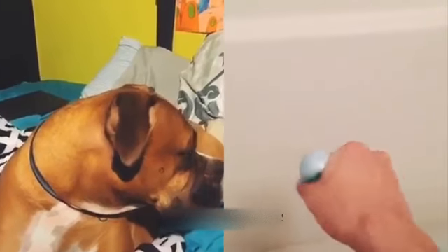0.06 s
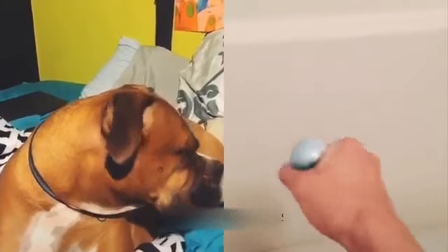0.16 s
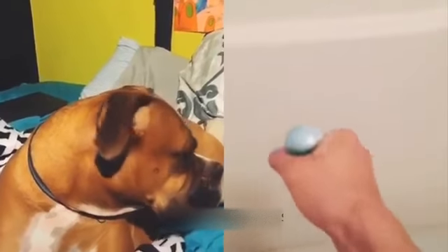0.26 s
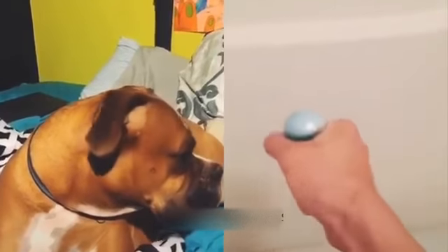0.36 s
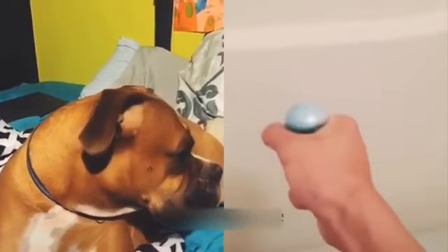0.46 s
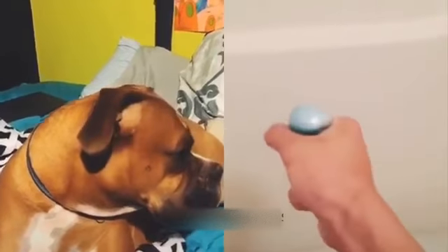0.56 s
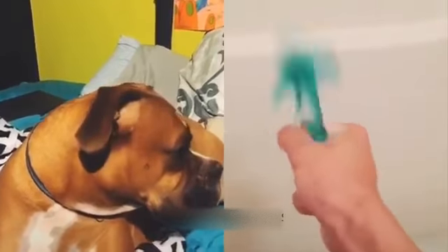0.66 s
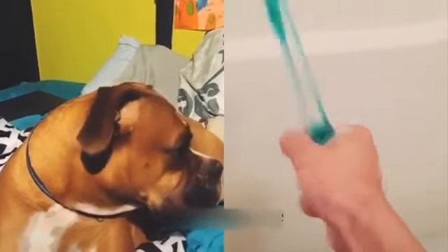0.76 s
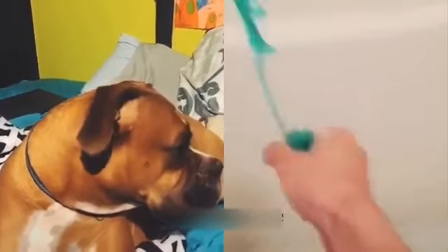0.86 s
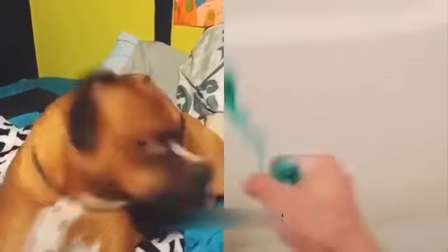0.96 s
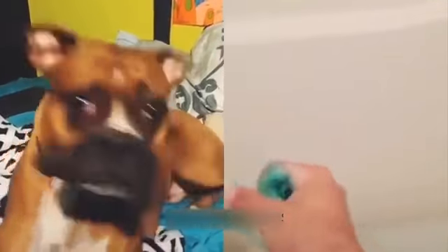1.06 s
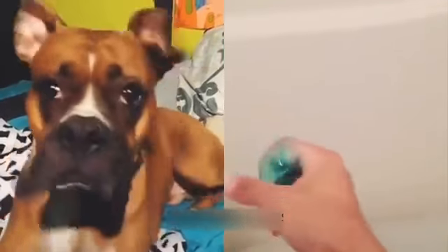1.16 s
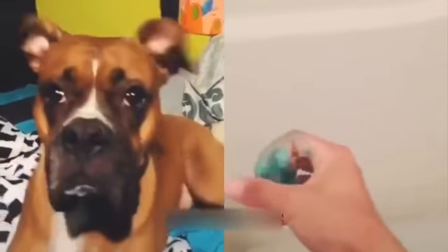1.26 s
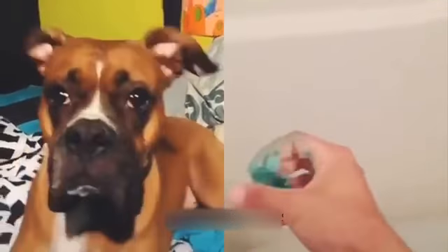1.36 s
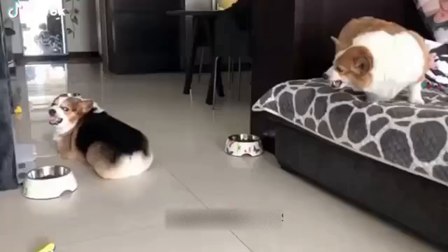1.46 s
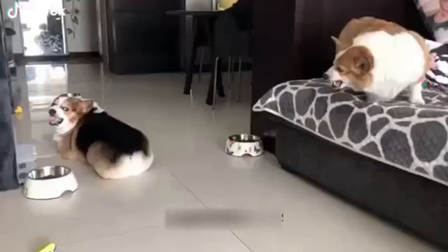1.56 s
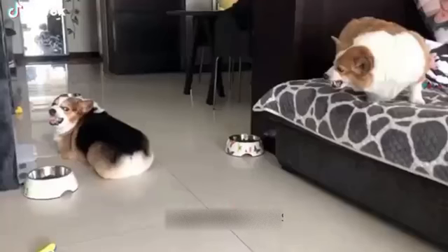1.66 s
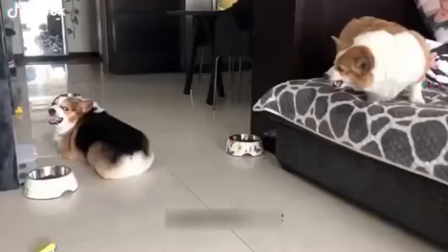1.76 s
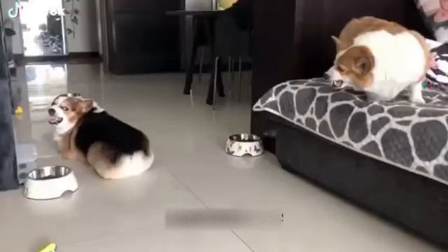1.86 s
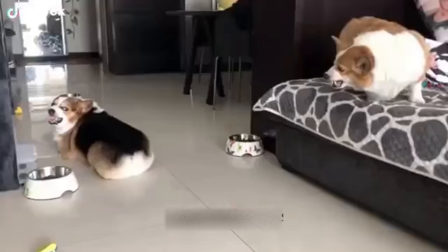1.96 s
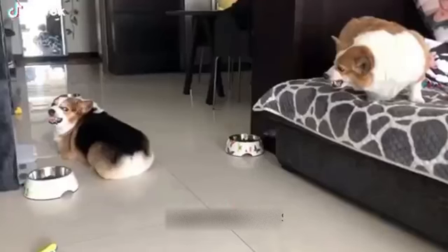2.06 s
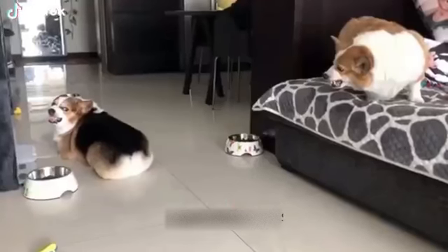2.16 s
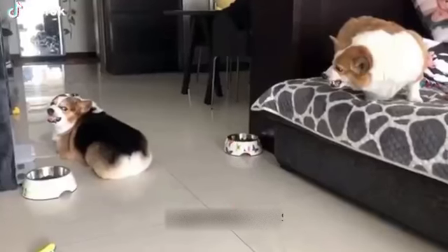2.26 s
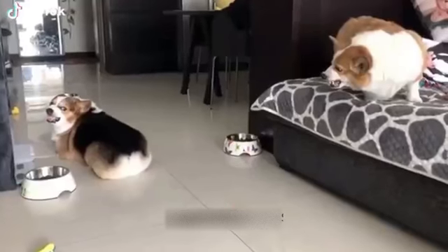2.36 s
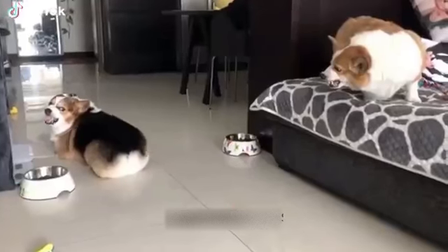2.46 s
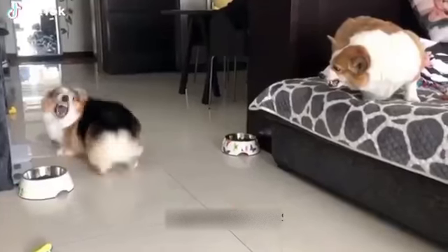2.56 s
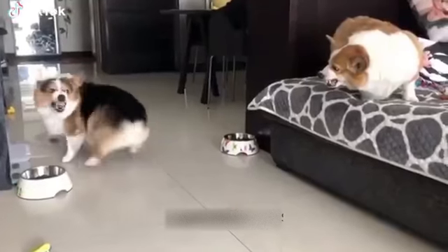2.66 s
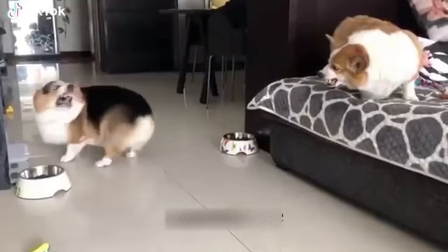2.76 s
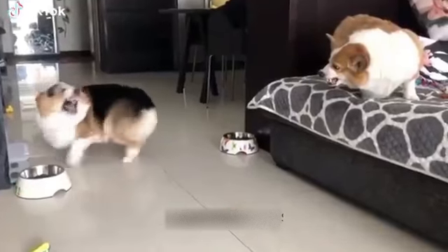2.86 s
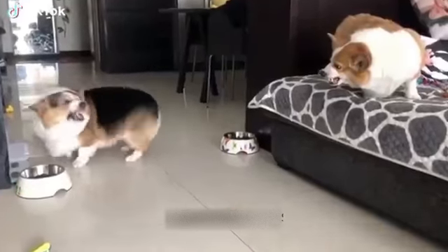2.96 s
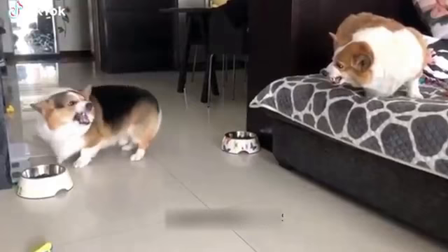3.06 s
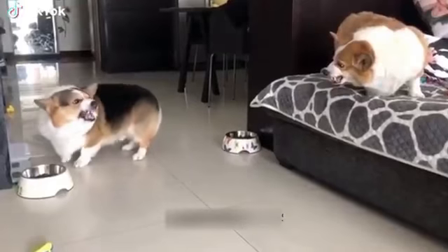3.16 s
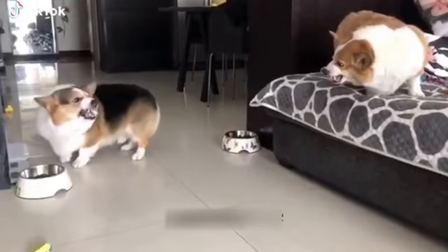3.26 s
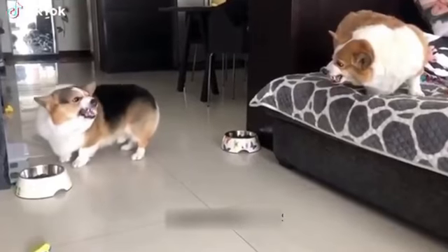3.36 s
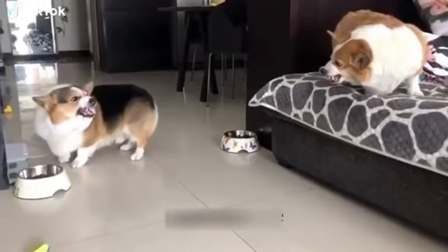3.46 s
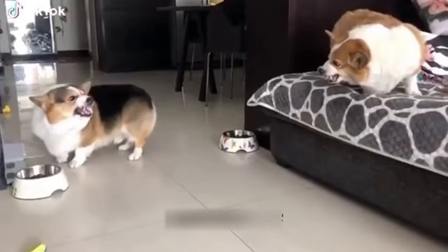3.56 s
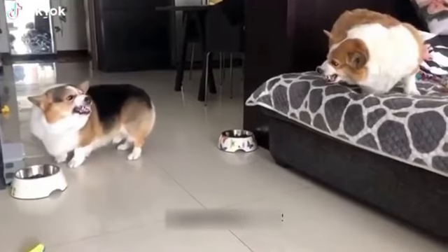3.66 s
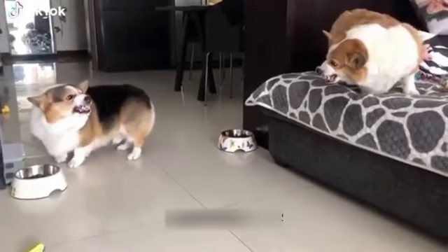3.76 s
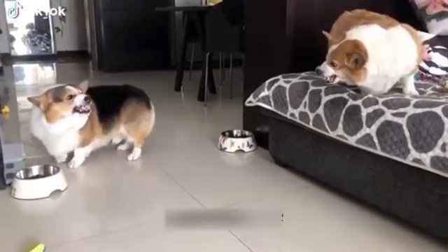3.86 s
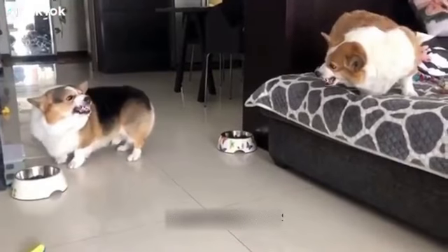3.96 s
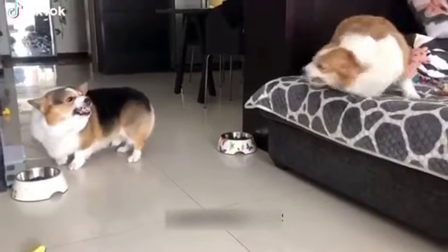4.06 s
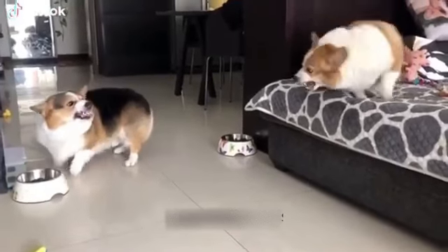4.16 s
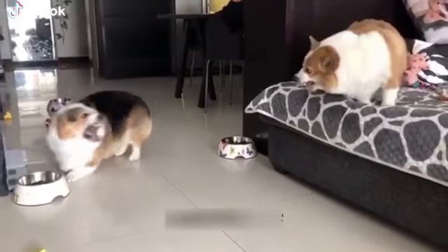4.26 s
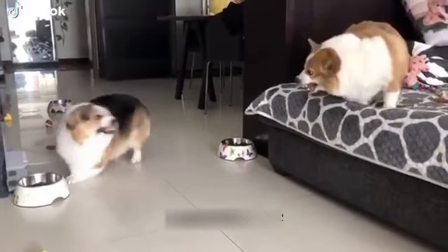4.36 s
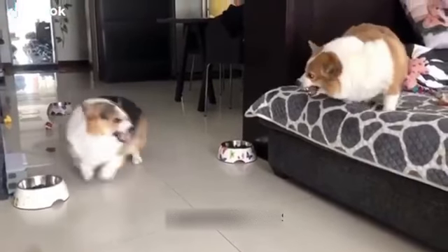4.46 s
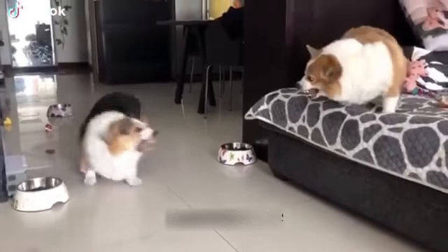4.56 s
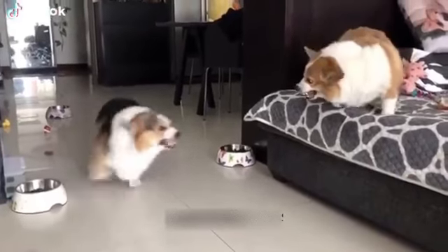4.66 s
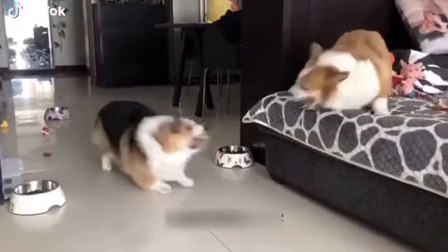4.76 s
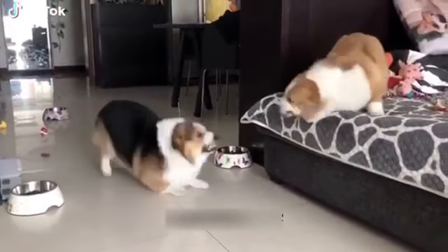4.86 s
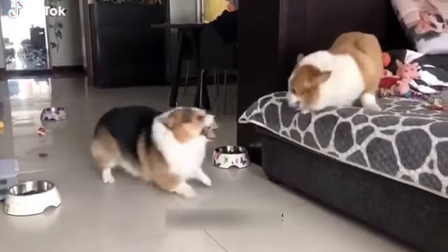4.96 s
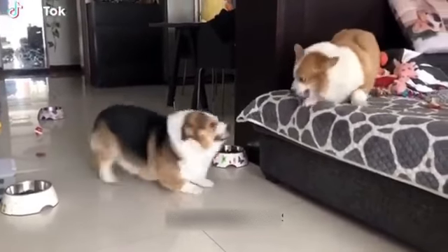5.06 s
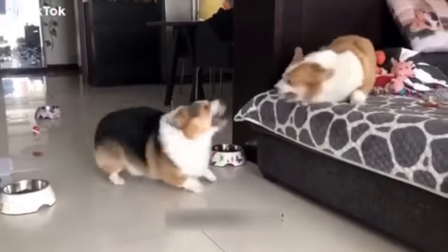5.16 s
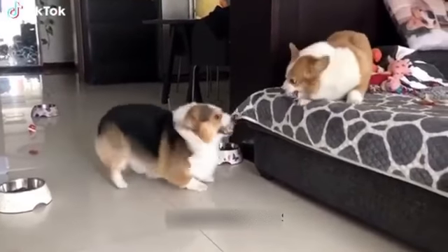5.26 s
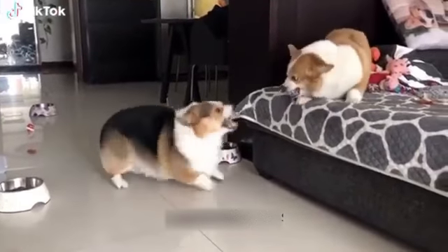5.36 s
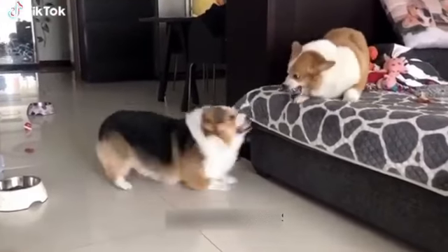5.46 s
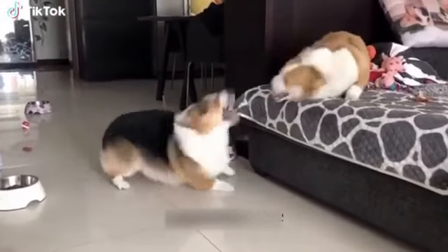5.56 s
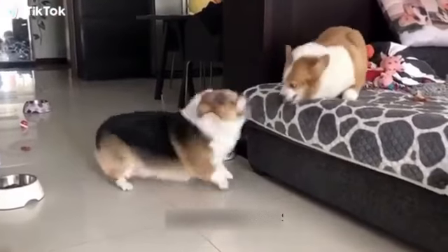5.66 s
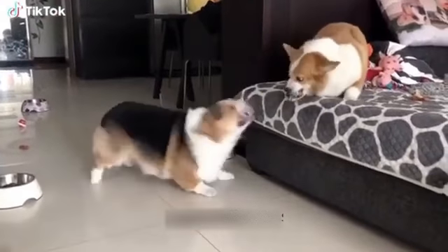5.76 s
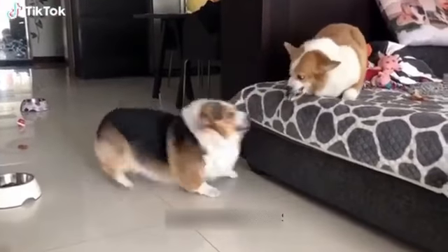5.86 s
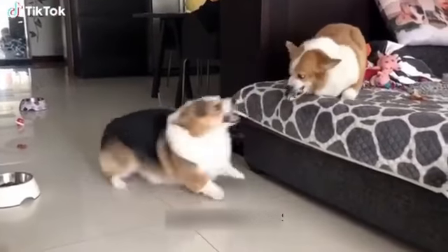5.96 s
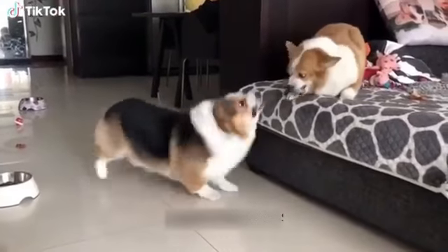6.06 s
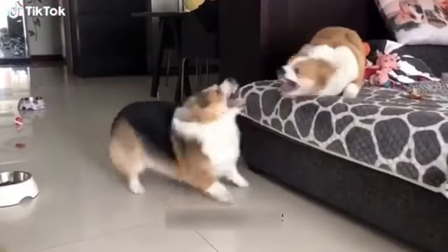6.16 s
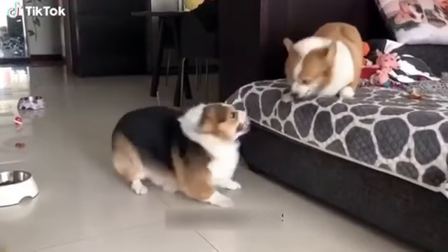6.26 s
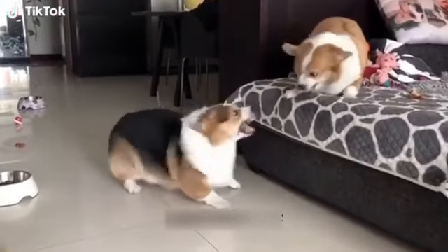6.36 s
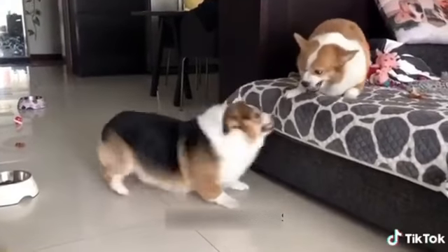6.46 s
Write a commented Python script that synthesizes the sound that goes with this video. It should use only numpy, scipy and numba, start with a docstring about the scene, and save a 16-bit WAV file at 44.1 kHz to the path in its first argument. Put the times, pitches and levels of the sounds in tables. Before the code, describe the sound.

A small quiet room hums softly until a popper scrapes and cracks violently, its short tail dying quickly. After a tiny silence the sound turns duller and more echoing: two dogs in a hard-floored living room, first growling low, then barking in single bursts and quick pairs, with wet rattling snarls and tooth clacks growing denser to the end. Loud moments distort at the nearby microphone.

```python
"""Low room air with faint tones, then a short scrape and the bang of a party popper in a small, quiet room.
After a moment of silence, two corgis quarrel in a tiled living room: a rattling growl runs on under snarls
and harsh barks, and teeth snap. The popper is shaped noise and a falling thump; the dogs' voices are rough
pulses and breath through throat resonances. The nearby microphone overloads on the loudest sounds."""
import sys
import numpy as np
from scipy import signal
from scipy.fft import rfft, irfft
from scipy.io import wavfile
from scipy.ndimage import uniform_filter1d, minimum_filter1d
from numba import njit

SR = 44100
rng = np.random.default_rng(int(sys.argv[2]) if len(sys.argv) > 2 else 0)


def waveform_to_disk(signal):
    """Save audio, clipped to [-1, 1], as 16-bit WAV at the path in sys.argv[1]."""
    frames = np.transpose(np.atleast_2d(signal))
    scaled = np.clip(frames, -1, 1) * 32767
    samples = np.round(scaled).astype(np.int16)
    wavfile.write(sys.argv[1], SR, samples)


N = 287091
TIME = np.arange(N) / SR


def undb(db):
    """Decibels to gain."""
    return 10 ** (np.asarray(db) / 20)


def level(x, db=0):
    """Scale to an rms level in dB."""
    return x * undb(db) / np.sqrt(np.mean(x ** 2) + 1e-18)


def add(out, start, x):
    """Mix x in at a time in seconds."""
    i = int(start * SR)
    out[i:i + len(x)] += x[:N - i]


def colour(x, points):
    """Weight a signal's spectrum by a curve of (frequency [Hz], level [dB]) points."""
    hz, db = np.transpose(points)
    f = np.fft.rfftfreq(len(x), 1 / SR)
    gain = undb(np.interp(np.log(f + 1), np.log(hz), db))
    return irfft(rfft(x) * gain, len(x))


def butter(x, hz, kind, order=2):
    """Plain low- or high-pass."""
    sos = signal.butter(order, np.minimum(hz, SR / 2 - 1), kind, fs=SR, output="sos")
    return signal.sosfilt(sos, x)


def cut(x, hz):
    """Steep low-pass."""
    return signal.sosfilt(signal.ellip(10, .2, 80, hz, fs=SR, output="sos"), x)


@njit
def svf(x, hz, width):
    """State-variable band-pass with a moving centre."""
    y, band, low = np.empty(len(x)), 0., 0.
    for i in range(len(x)):
        g, k = np.tan(np.pi * hz[i] / SR), width / hz[i]
        v = (band + g * (x[i] - low)) / (1 + g * (g + k))
        band = 2 * v - band
        low = low + 2 * g * v
        y[i] = k * v
    return y


def resonance(x, hz, width):
    """A resonance with steep skirts: two equal band-passes in a row."""
    centre = hz * np.ones(len(x))
    return svf(svf(x + 1e-18, centre, float(width)), centre, float(width))


def walk(rate, size):
    """Smooth random wandering around zero, with a new target rate times a second."""
    knots = rng.standard_normal(2048)
    return np.interp(np.arange(size) * rate / SR, np.arange(len(knots)), knots)


def small_room():
    """Low, slightly wavering air noise with a few faint tones, made from very narrow bands of noise."""
    # spectrum of the air: (frequency [Hz], relative level [dB per Hz])
    air_spectrum = [(20, -25), (45, 0.5), (90, 0.5), (140, -7.5), (200, -8.5), (260, -13.5), (350, -7),
                    (550, -15.5), (900, -12), (1500, -21), (2500, -30.5), (4000, -40), (8000, -55),
                    (14000, -67.5)]
    # faint tones, before the hush: (frequency [Hz], level [dB rms])
    hum = [(199.2, -48.5), (344.5, -49.5), (678.3, -54.5), (909.8, -53), (2067, -59)]
    # the background sinks after the bang and comes partly back: (time [s], level [dB])
    hush = [(0, -1), (.94, -1.5), (1.02, -33), (1.2, -13.5), (1.45, -8)]
    air = level(colour(rng.standard_normal(N), air_spectrum), -38)
    air += level(resonance(rng.standard_normal(N), 2080, 210), -56.0)
    air += sum(level(resonance(rng.standard_normal(N), hz, 4.3), db) for hz, db in hum)
    return air * undb(np.interp(TIME, *np.transpose(hush)) + .6 * walk(18, N))


def popper():
    """The trigger scrapes, the charge cracks, and the gust of gas thumps, falling in pitch."""
    # spectrum of the crack: (frequency [Hz], relative level [dB per Hz])
    crack_spectrum = [(200, -28.5), (320, -37.5), (600, -9.5), (900, -6.5), (1500, -4), (2300, -2),
                      (3200, 0.5), (4200, 5.5), (5400, -2), (6400, -10), (9000, -14), (12500, -14),
                      (14500, -41)]
    t = np.arange(SR) / SR
    out = np.zeros(N)
    scrape = level(resonance(rng.standard_normal(SR), 3900, 5000), -33) * np.exp(-t / .04)
    add(out, .911, scrape)
    crack = level(colour(rng.standard_normal(SR), crack_spectrum))
    # the crack holds for 22 ms, then drops fast over a weaker, slower tail
    fade = np.exp(-np.maximum(t - .022, 0) / 0.023) + undb(-22.0) * np.exp(-t / 0.1)
    # hard walls keep the bright middle of the crack ringing
    ring = level(resonance(rng.standard_normal(SR), 5400, 2200), -48.5) * np.exp(-t / 0.078)
    thump_hz = 60 + 210 * np.exp(-t / .0055)
    thump = np.sin(2 * np.pi * np.cumsum(thump_hz) / SR) * np.exp(-(t / 0.037) ** 2)
    gust = level(resonance(rng.standard_normal(SR), 140, 380), -4) * np.exp(-(t / 0.023) ** 2)
    bang = undb(-4.0) * crack * fade + ring + undb(-1.0) * thump + gust
    add(out, .9315, bang * np.minimum(t / 0.0012, 1))
    # streamers rustle as they land
    flutter = undb(3.7 * walk(167, SR))
    rustle = level(resonance(rng.standard_normal(SR) * flutter, 4700, 9000), -46.0)
    add(out, 1.41, rustle * np.minimum(t / 0.034, 1) * np.exp(-t / 0.2))
    return out


def folds(hz, jitter, scatter_db, rough, puff=0.71):
    """Vocal folds: uneven closures, each followed by a puff of turbulent air (puff in cycles)."""
    size, rate = len(hz), np.mean(hz)
    cycles = np.cumsum(hz * np.exp(jitter * walk(rate, size))) / SR
    pulses = np.diff(np.floor(cycles), prepend=-1)
    air = rng.standard_normal(size) * np.exp(-(cycles % 1) / puff)
    rough = np.clip(rough, 0, 1)
    mix = np.sqrt(1 - rough) * level(pulses) + np.sqrt(rough) * level(air)
    return mix * undb(scatter_db * walk(rate, size))


def growl():
    """Slow, slack pulses boom in the chest and rattle through the muzzle; air hisses past the teeth."""
    # the boom in the chest: (time [s], level [dB])
    chest_curve = [(1.6, -35), (2.75, -35), (3.1, -43.5), (3.6, -46), (3.69, -37.5), (3.8, -47.5),
                   (4.0, -43), (4.22, -28.5), (4.45, -39.5), (4.78, -42.5), (4.9, -31.5), (5.17, -41),
                   (5.32, -32), (6.28, -34), (6.39, -43), (6.5, -29)]
    # the rattle in the mouth, louder once the quarrel is on: (time [s], level [dB])
    mouth_curve = [(1.7, -47.5), (2.45, -41.5), (2.751, -27), (3.08, -45), (3.331, -43.5), (3.47, -58),
                   (3.78, -44.5), (4.0, -43), (4.2, -27), (4.6, -34), (5.13, -30.5), (5.35, -24),
                   (5.95, -30), (6.15, -25.5), (6.5, -36.5)]
    # resonances behind bared teeth: (centre [Hz], width of each band-pass [Hz], gain [dB])
    muzzle = [(492, 80, -9), (642, 380, 0), (857, 350, -11.5), (1960, 500, -6.5), (2310, 640, -12.5),
              (3320, 980, -14)]
    chest_db = np.interp(TIME, *np.transpose(chest_curve))
    mouth_db = np.interp(TIME, *np.transpose(mouth_curve))
    pulse_hz = 68 * np.exp(.12 * walk(4, N))
    source = folds(pulse_hz, jitter=.17, scatter_db=.7, rough=.2)
    chest = butter(butter(source, 105, "high", order=3), 280, "low", order=6)
    chest = level(level(chest) + level(resonance(source, 149, 92), -16.0))
    # wet lips add turbulence; the soft palate flaps it into short bursts, around 23.5 a second
    rasp = source + 1.1 * rng.standard_normal(N)
    flaps = np.cumsum(23.5 + 3 * walk(12, N)) / SR
    rattle = 1 + np.exp(-((flaps % 1 - .3) / .17) ** 2)
    # the mouth's resonances wander together
    shape = np.exp(0.14 * walk(5.8, N))
    mouth = sum(undb(db) * resonance(rasp * rattle, hz * shape, width) for hz, width, db in muzzle)
    hiss = level(resonance(rng.standard_normal(N), 6070, 2400), -18.0) * undb(2.0 * walk(7.7, N))
    return chest * undb(chest_db) + (level(mouth) + hiss) * undb(mouth_db)


def formant(x, hz, width):
    """A throat resonance: a sharp peak on broader, steep skirts."""
    centre = hz * np.ones(len(x))
    return svf(svf(x + 1e-18, centre, float(width)), centre, float(2.35 * width))


def voice(attack_s, length, db, fade_db, pitch, rough, jaw_open_hz, jaw_shut_hz,
          tongue_hz, tongue_db, lip_hz, lip_db, hiss_db):
    """One push of air through folds and throat: the pitch arches and sags as the jaw opens and shuts."""
    t = np.arange(int((length + 0.027) * SR)) / SR
    along = np.minimum(t / length, 1)
    # the breath strikes, changes level most quickly early on, and lets go just before the end
    attack = np.clip(t / attack_s, 0, 1) ** 1.4
    release = np.exp(-np.maximum(t - length + 0.0075, 0) / 0.0053)
    push = attack * undb(-fade_db * along ** 0.54) * release
    hz = pitch * (1 + .11 * np.sin(np.pi * along) - .17 * along)
    # the voice breaks up as it goes
    hoarse = np.maximum(rough + 0.14 * (along - .5), 0)
    source = folds(hz, jitter=.09 * hoarse, scatter_db=3.2 * hoarse, rough=0.85 * hoarse)
    # leaky, rough folds damp the throat's resonances
    width = 185 + 150 * rough
    # the jaw drops fast, stays wide, then shuts; the tongue draws back
    jaw_drop = 1 - 0.23 * np.exp(-t / 0.011)
    jaw_hz = jaw_open_hz * jaw_drop + (jaw_shut_hz - jaw_open_hz) * along ** 1.39
    jaw = level(formant(source, jaw_hz, width))
    tongue_glide = 1 - 0.1 * (along - .5)
    tongue = level(formant(source, tongue_hz * tongue_glide, 1.31 * width), tongue_db)
    lips = level(formant(source, lip_hz, 1.95 * width), lip_db)
    # the hiss dies away
    hiss = level(resonance(rng.standard_normal(len(t)), 4100, 6700), hiss_db) * undb(7.5 * (.5 - along))
    # soft pushes keep more chest tone than loud ones, and it swells along the way
    chest_db = -21.5 + 0.51 * min(-db, 22)
    chest = level(resonance(source, 496, 260), chest_db) * undb(4.5 * along)
    # the upper resonances come in as the mouth opens, over the first 14 % of the push
    opening = np.clip(along / 0.14, 0, 1)
    # loose tissue in the throat flaps and ripples the voice
    flap = undb(1.4 * walk(85.2, len(t)) + 2.6 * np.cos(2 * np.pi * 34 * t))
    return level((jaw + chest + opening * (lips - tongue + hiss)) * push * flap, db)


def snarl(length, db, jaw_hz, tongue_hz, lip_hz, bright_db):
    """A low, hoarse push through a mouth that hardly moves; bared teeth hiss more when it is bright."""
    return voice(attack_s=0.023, length=length, db=db, fade_db=2, pitch=179.5, rough=.8,
                 jaw_open_hz=jaw_hz, jaw_shut_hz=jaw_hz * 0.86, tongue_hz=tongue_hz, tongue_db=bright_db,
                 lip_hz=lip_hz, lip_db=bright_db - 4, hiss_db=-5.5 + 1.17 * bright_db)


def bark(length, db, fade_db, pitch, rough, *mouth):
    """A full-voiced push: the longer it is the slower it swells, the rougher the more it hisses."""
    attack_s = 0.013 + 0.081 * length
    hiss_db = -28 + 17 * rough
    return voice(attack_s, length, db, fade_db, pitch, rough, *mouth, hiss_db)


def snap(db, hz):
    """Jaws clack shut and the mouth rings for an instant; db sets the peak."""
    t = np.arange(SR // 60) / SR
    click = rng.standard_normal(len(t)) * np.exp(-t / 0.0014)
    ring = resonance(click, hz, 500) + 0.0068 * click
    return undb(db) * ring / np.abs(ring).max()


def tiled_room(x, t60_s, treble_t60_s, wet_db, early_db):
    """Direct sound, a few reflections off floor and furniture, then a diffuse tail; dB against direct."""
    t = np.arange(SR) / SR
    noise = rng.standard_normal(SR)
    low = butter(noise, 3000, "low", order=1)
    tail = low * np.exp(-np.log(1000) * t / t60_s)
    tail += (noise - low) * np.exp(-np.log(1000) * t / treble_t60_s)
    tail *= np.clip(t / 0.0098, 0, 1)
    response = undb(wet_db) * tail / np.linalg.norm(tail)
    response[0] += 1
    response[rng.integers(SR // 400, SR // 35, size=6)] += undb(early_db)
    return signal.fftconvolve(x, response / np.linalg.norm(response))[:N]


def dogs():
    """Both dogs' growl, snarls, barks and snaps ring in the living room, over its air, with a dull top."""
    # soft, hoarse pushes between barks: (start [s], length [s], level [dB], open jaw resonance [Hz],
    # tongue resonance [Hz], lip resonance [Hz], brightness [dB])
    snarls = [ (1.658, 0.11, -41, 710, 1870, 2470, -4.5), (2.037, 0.16, -37.5, 650, 1890, 2350, -11.5),
              (2.796, .045, -17.5, 920, 1480, 3500, -8), (3.623, 0.089, -39.5, 640, 1860, 2500, -10),
              (4.272, 0.066, -16.5, 620, 1430, 3470, 2), (4.82, .056, -26, 910, 1310, 1910, 2.5),
              (4.94, 0.16, -25.5, 1100, 1460, 2030, 4.5), (5.763, .047, -21, 690, 1320, 3550, 3),
              (5.818, .046, -25, 686, 1700, 2280, 3), (6.179, 0.11, -20.5, 920, 1600, 2180, -0.5),
              (6.247, 0.066, -21.5, 773, 1340, 2160, -5.5), (6.429, 0.13, -27, 960, 2290, 2720, -4.5), ]
    # one push of air each, some in quick pairs: (start [s], length [s], level [dB], fade along the bark [dB],
    # base pitch [Hz], roughness [0-1], jaw resonance wide open [Hz], jaw resonance nearly shut [Hz],
    # tongue resonance [Hz], tongue level [dB], lip resonance [Hz], lip level [dB])
    barks = [ (2.51, .216, -3.5, 13, 285.8, 0.53, 788, 602, 1585, -3, 2390, -10.5),
             (2.825, 0.088, -6.5, -1.5, 298.8, 0.38, 850, 770, 1460, 5.5, 2510, -11.5),
             (2.904, 0.061, -17.5, 0, 416.2, 0.25, 764, 760, 1400, -22, 2270, -13),
             (4.051, 0.041, -3.5, -5.5, 525.7, 0.4, 990, 1000, 1280, -18.5, 2800, -19),
             (4.098, .034, -4.5, 0, 349.6, 0.56, 915, 650, 1540, -1, 2750, -12),
             (4.283, .18, -3, 8.5, 265.9, 0.53, 764, 620, 1510, -0.5, 2150, -8.5),
             (4.867, 0.029, -3.5, 1, 527.7, 0.46, 1080, 1020, 1330, -7.5, 1950, -12),
             (4.906, 0.046, -13, -2, 364.8, 0.68, 1080, 1150, 1440, 7.5, 2100, -15),
             (5.237, .09, -9, 16.5, 390, 0.78, 1380, 450, 1770, 2, 2850, -10),
             (5.444, .098, -17, 22.5, 369, 0.7, 1260, 480, 1820, -4.5, 2390, -2),
             (5.606, 0.075, -15.5, 8.5, 480.3, 0.7, 1130, 570, 1674, -8, 2150, -14),
             (6.047, 0.044, -1, -3, 323.9, 0.68, 1260, 905, 1470, -2.5, 2170, -5),
             (6.098, 0.061, -7, -3, 464, 0.48, 940, 890, 1550, -5.5, 2020, 2.5), ]
    # snapping teeth: (start [s], peak level [dB], ring [Hz])
    snaps = [(5.221, -3, 1396), (5.463, -1, 1730), (5.624, 5, 1020)]
    # spectrum of the living room's air: (frequency [Hz], relative level [dB per Hz])
    air_spectrum = [(24, -26.5), (40, -18), (114, 3), (211, -13), (373, -20.5), (916, -6), (1930, -30.5),
                    (2680, -32.5), (3890, -24.5), (7500, -59.5), (9750, -77), (16500, -120)]
    voices = growl()
    for start, *row in snarls:
        add(voices, start, snarl(*row))
    for start, *row in barks:
        add(voices, start, bark(*row))
    for start, db, hz in snaps:
        add(voices, start, snap(db, hz))
    room = tiled_room(voices, t60_s=0.52, treble_t60_s=0.56, wet_db=-6, early_db=-13.5)
    air = level(colour(rng.standard_normal(N), air_spectrum), -43.5)
    return cut(room + air, 7600)


def scene():
    """The popper in the small room, a moment of silence, then the dogs."""
    silence_from_s, silence_to_s = 1.459, 1.582
    first = np.clip((silence_from_s - TIME) / 0.00055, 0, 1)
    second = np.clip((TIME - silence_to_s) / 0.014, 0, 1)
    return ((small_room() + popper()) * first + dogs() * second)[None]


def record(dry):
    """A fast limiter holds down the loudest sounds, what is left clips at full scale, and the top is cut."""
    over = np.maximum(np.abs(dry) / 1.17, 1)
    # the gain dips around each peak, smoothed over 111 samples (2.5 ms)
    gain = uniform_filter1d(minimum_filter1d(1 / over, size=111), size=111)
    clipped = np.clip(dry * gain, -1, 1)
    return cut(butter(clipped, 14200, "low", order=8), 15000)


dry = scene()
out = record(dry)
waveform_to_disk(out)
```